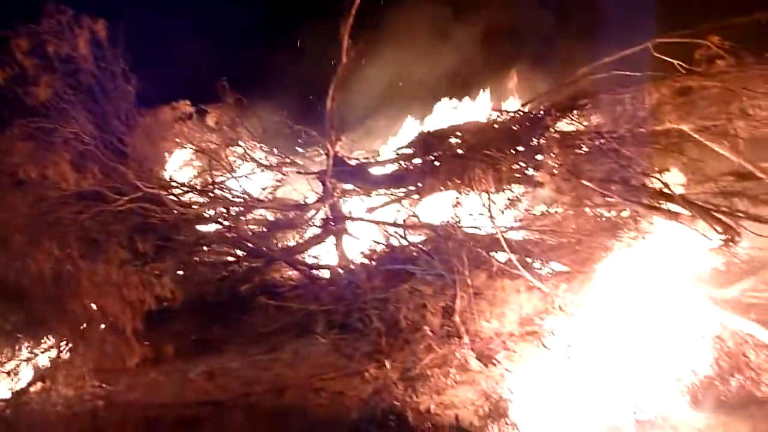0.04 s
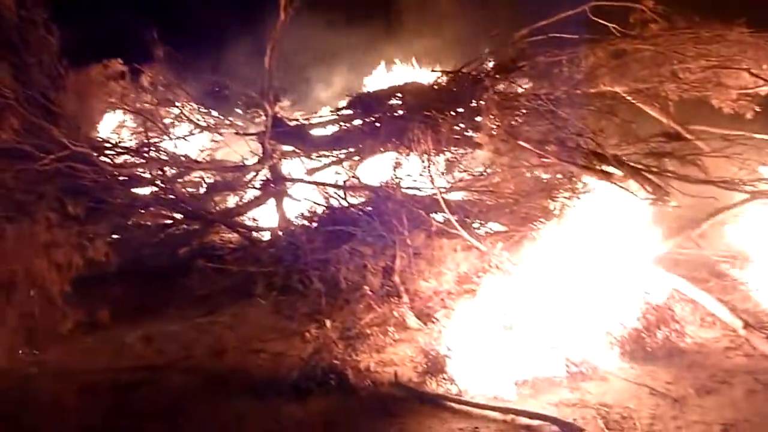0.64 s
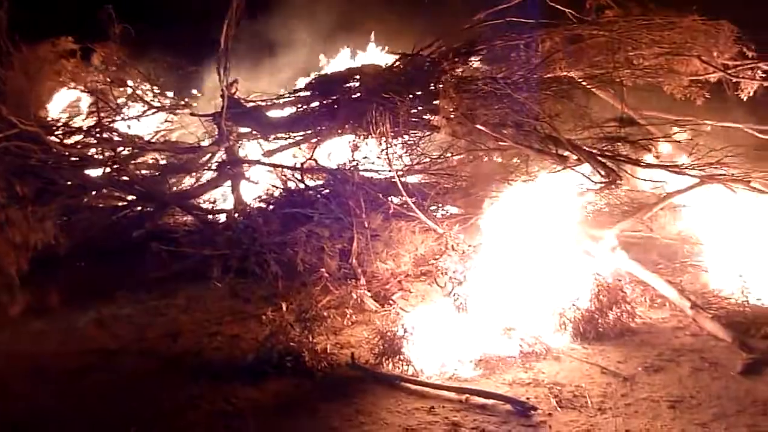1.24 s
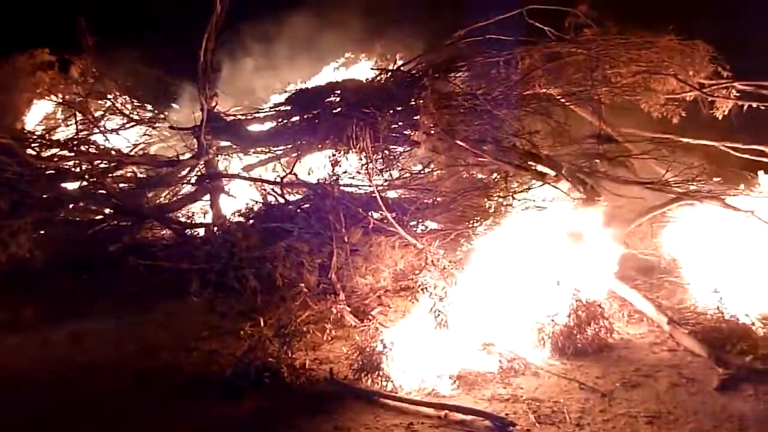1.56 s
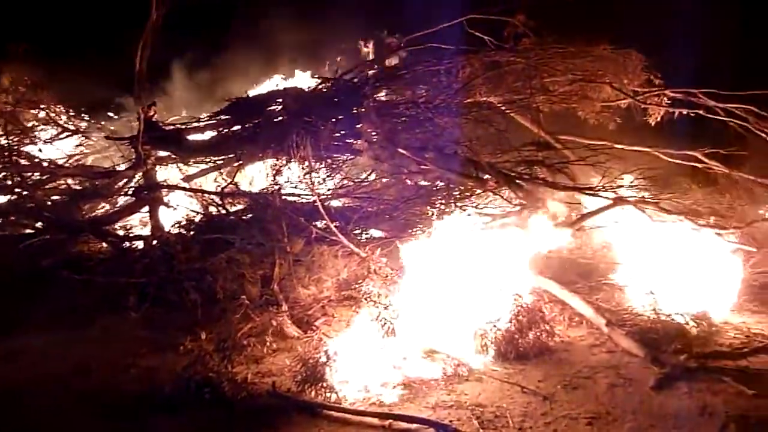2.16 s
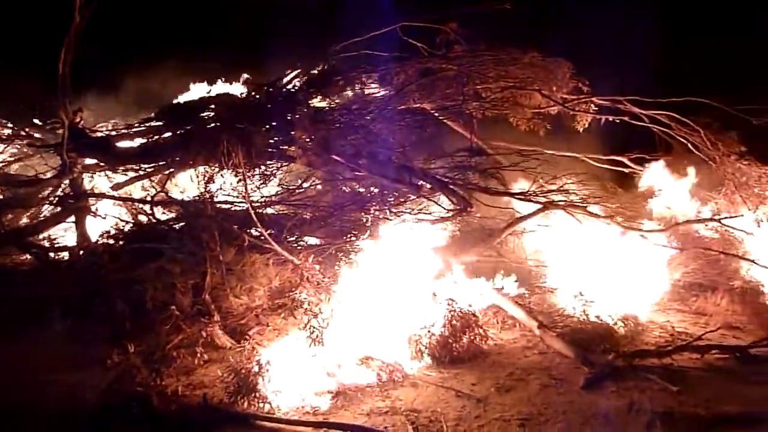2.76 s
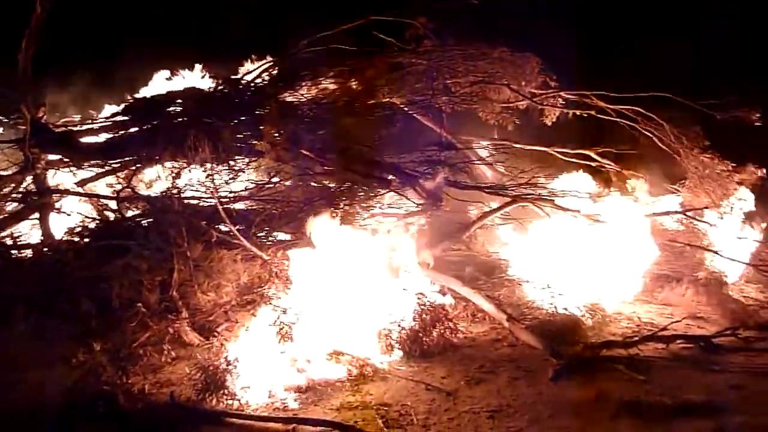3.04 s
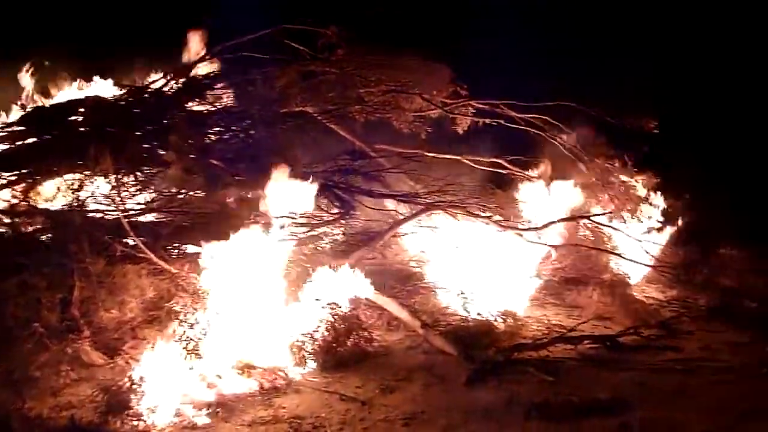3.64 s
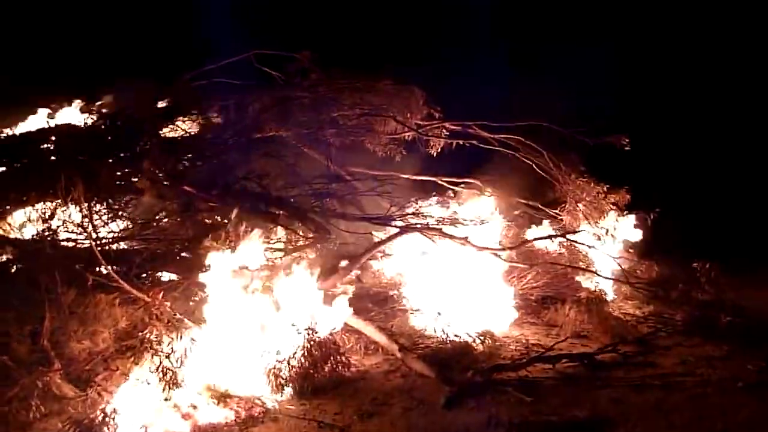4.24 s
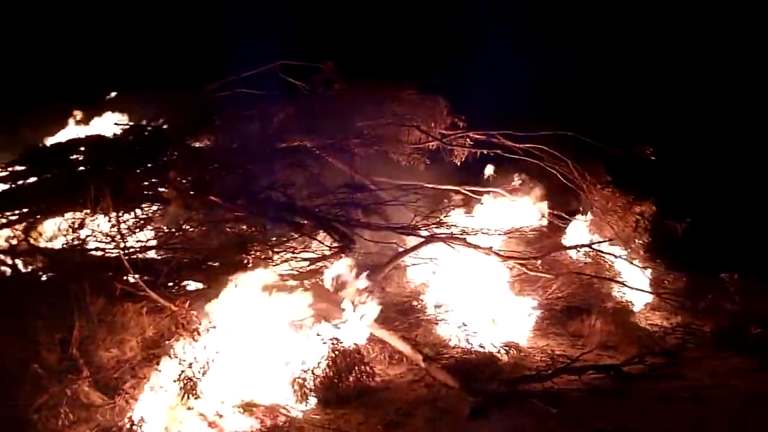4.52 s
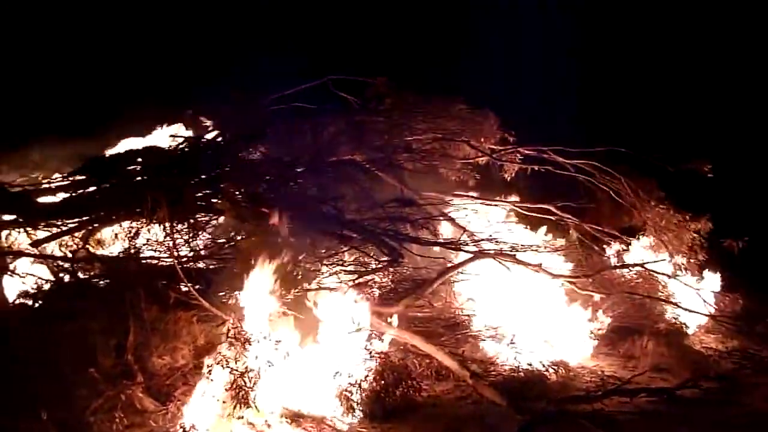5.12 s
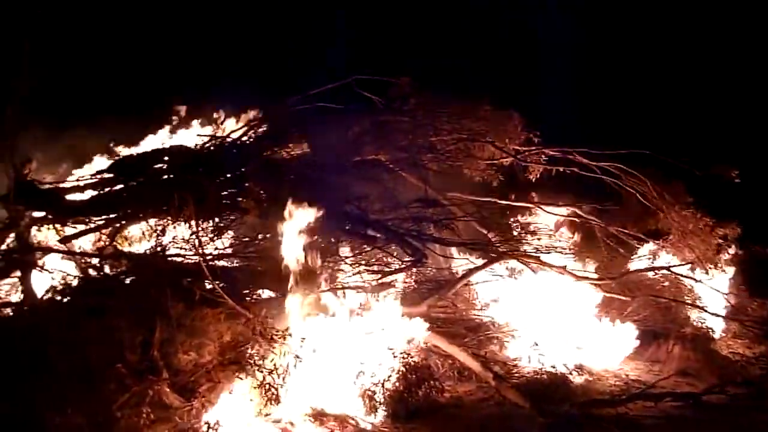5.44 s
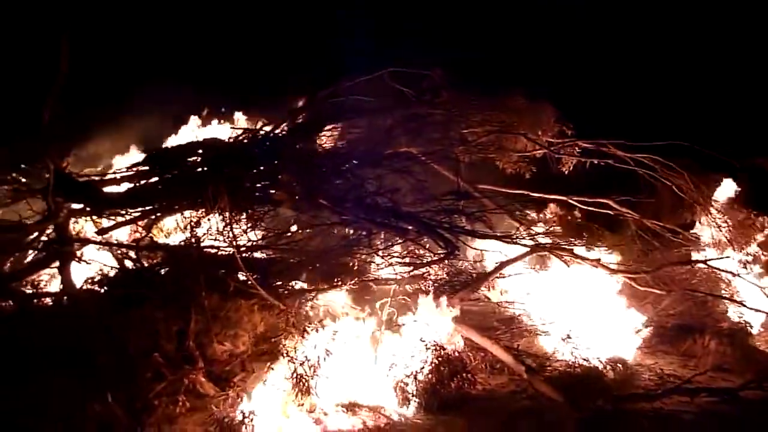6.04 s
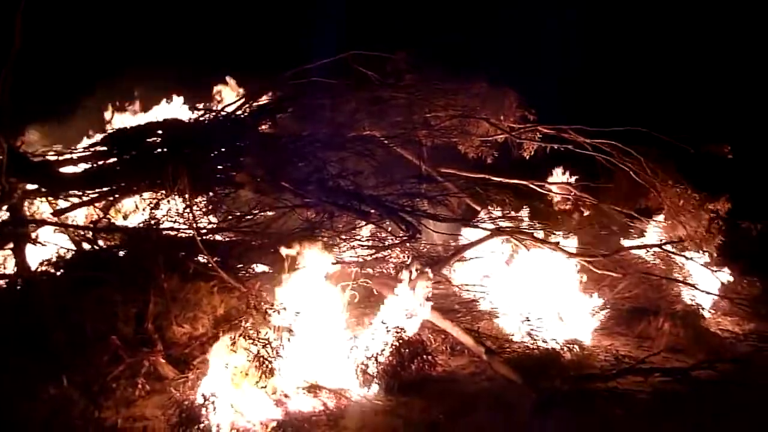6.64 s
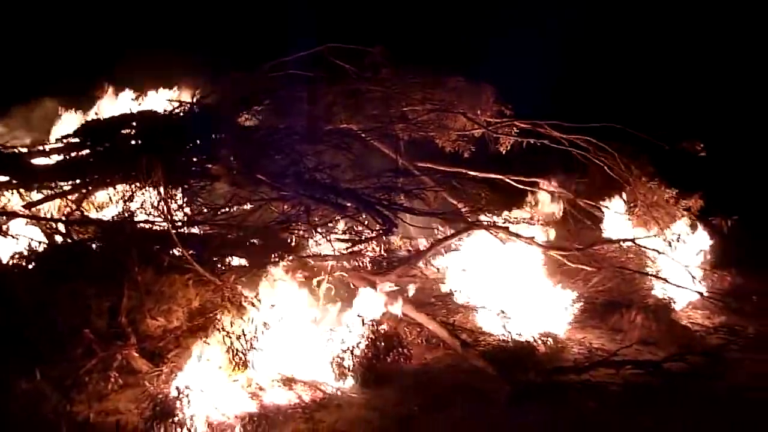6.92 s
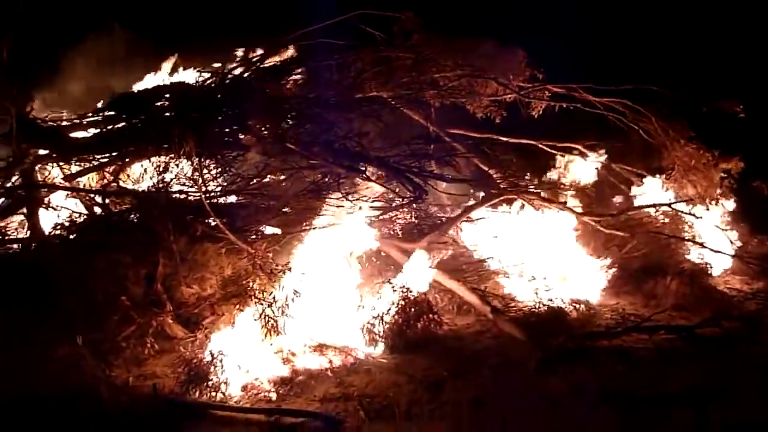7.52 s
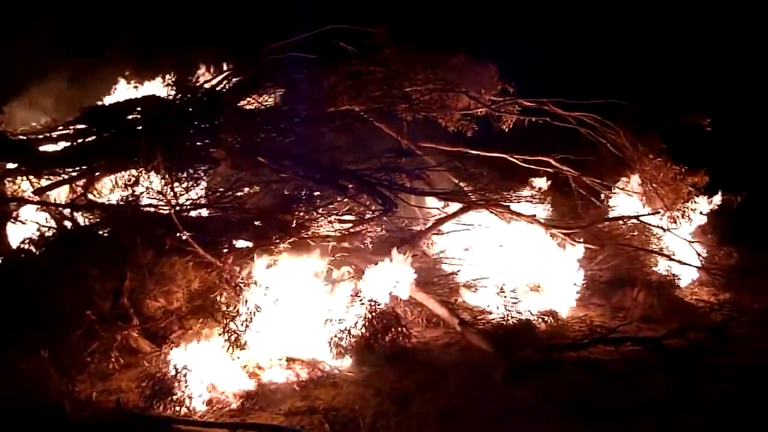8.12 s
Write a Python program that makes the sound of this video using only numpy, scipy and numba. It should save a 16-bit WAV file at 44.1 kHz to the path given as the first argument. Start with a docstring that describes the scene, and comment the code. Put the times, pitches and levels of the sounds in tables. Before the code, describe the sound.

Uneven wind thumps and rumbles on a microphone near an outdoor brush fire. The flames roar softly beneath sizzling sap, constant small crackles and scattered sharp snaps of wood. The strongest gusts come early and make the fire dip for a moment. The wind then eases, letting the pops stand out, before lighter gusts return and the crackling grows a little quieter.

```python
"""A large brush pile burns outdoors at night, in a gusty wind.
The flames roar softly, sap sizzles out in tiny jets and twigs crackle; now and then one bursts with
a sharp pop that scatters through the branches. Air drawn into the pile adds a deep, even rumble.
The wind buffets the microphone with a lumpy rumble that grows brighter as it blows harder;
each strong blow makes the recorder's gain control turn the fire down for a moment."""
import sys
import numpy as np
from scipy import signal
from scipy.io import wavfile
from scipy.ndimage import uniform_filter1d, minimum_filter1d
from numba import njit

SR = 44100
rng = np.random.default_rng(int(sys.argv[2]) if len(sys.argv) > 2 else 0)


def store_wav(level_fs):
    """Save 16-bit WAV to argv[1]."""
    pcm = np.round(np.clip(np.atleast_2d(level_fs), -1, 1) * 32767)
    wavfile.write(sys.argv[1], SR, pcm.T.astype(np.int16))


N = 365148
TIME = np.arange(N) / SR
USUAL_CORNER_HZ = 280  # in a middling wind, the rumble falls away above this "corner"

# strong eddies (swirls of air) that hit the microphone: peak_s, level_db, corner_hz, length_ms
STRONG_EDDIES = [(.123, -20, 206, 11), (.275, -16, 504, 32), (.315, -22, 500, 26), (.618, -22, 206, 19),
                 (0.72, -12.5, 584, 7.2), (.829, -12.5, 480, 11.3), (0.856, -9, 438, 19),
                 (0.91, -11, 290, 19), (0.924, -14, 395, 7), (1.055, -26, 120, 24), (1.709, -15, 260, 27),
                 (1.723, -9.5, 440, 8.1), (1.758, -3, 325, 6.6), (1.771, -1, 370, 11.6),
                 (1.797, -4.5, 636, 7.1), (1.857, 2.5, 260, 8.2), (1.913, 2.5, 330, 8.7),
                 (1.928, -6, 490, 23), (2.498, -10.5, 564, 9.6), (2.519, -2, 260, 8.5),
                 (2.542, -6, 516, 6.3), (2.55, -12, 437, 11), (2.578, -12, 350, 5.5),
                 (2.594, -15.5, 380, 7.5), (2.649, -16.5, 169, 16), (2.693, -9.5, 347, 10),
                 (2.801, -17.5, 189.8, 9.7), (2.886, -14, 232, 22.3), (2.929, -16, 301.5, 10),
                 (3.193, -23.5, 177, 13), (3.451, -9.5, 166, 11.3), (3.498, -19, 198, 10),
                 (3.555, -24, 137, 14.4), (3.667, -21.5, 260, 11), (3.703, -13.5, 228, 13.7),
                 (3.762, -24, 238, 23), (3.861, -24.5, 186.5, 13), (4.013, -21, 162, 13),
                 (4.039, -19, 148.6, 13), (4.172, -23, 209, 16), (4.211, -16.5, 131, 21),
                 (4.3, -21, 120.3, 26), (4.468, -20, 179.4, 24), (4.516, -24, 140, 19),
                 (4.683, -22, 137.2, 21), (4.746, -30, 320, 4.4), (4.846, -20, 237, 14),
                 (4.99, -21, 220, 12), (5.479, -13, 151, 18), (5.585, -27, 149, 11), (5.78, -20.5, 166, 23),
                 (5.859, -12.5, 560, 6.9), (5.877, -7, 315, 8.7), (5.983, -11, 140, 18),
                 (6.001, -13, 522, 5), (6.012, -18, 501, 12), (6.252, -18, 260, 10), (6.264, -14, 426, 7.6),
                 (6.27, -12, 388, 5.4), (6.305, -16.5, 410, 13), (6.389, -9, 280, 7),
                 (6.402, -14, 521, 5.7), (6.41, -11.5, 700, 6.3), (6.431, -19.5, 400, 26),
                 (6.508, -18, 247, 17), (6.738, -15.5, 125, 20.5), (6.775, -19.5, 294, 13.7),
                 (6.844, -15.5, 209, 21), (6.933, -18, 107.8, 13), (7.14, -22, 220, 16),
                 (7.198, -14.5, 196, 22), (7.305, -13.5, 154, 19), (7.504, -16, 294.5, 18),
                 (7.576, -17.5, 148, 21), (7.628, -20.5, 320, 6.2), (7.71, -22, 360, 19),
                 (7.755, -14.5, 393, 7.8), (7.769, -18, 394, 9.4), (7.831, -22, 380, 6.6),
                 (7.85, -13, 270, 11), (7.89, -15, 304, 10.5), (7.956, -15.5, 480, 3.8),
                 (7.994, -21.5, 457, 9.2), (8.013, -18.5, 456, 4.7), (8.061, -20, 204, 9.2),
                 (8.126, -17, 138, 14), (8.159, -19.5, 400, 5.1), (8.198, -20, 460, 15)]


def from_db(db):
    """Turn decibels into a number to multiply by."""
    return 10 ** (np.asarray(db) / 20)


def rms_one(x):
    """Scale a signal so that its average strength (rms) is 1."""
    return x / np.sqrt(np.mean(x ** 2) + 1e-20)


def in_time(rows):
    """Join a table's timed points with straight lines: one curve for each column after the time."""
    times_s, *columns = np.transpose(rows)
    return [np.interp(TIME, times_s, column) for column in columns]


def butter(x, hz, kind, order=2):
    """Keep the "low" part, the "high" part or one "band" of a sound."""
    return signal.sosfilt(signal.butter(order, np.clip(hz, 10, .45 * SR), kind, fs=SR, output="sos"), x)


def drift(rate):
    """A smooth random wobble with a spread of 1, changing about rate times a second."""
    keep = np.exp(-80 * np.pi * rate / SR)
    noise = rng.standard_normal(N // 40 + 2002)  # one value per 40 samples, plus a run-up
    slow = signal.lfilter([1], [1, -2 * keep, keep * keep], noise)[2000:]
    return np.interp(np.arange(N) / 40, np.arange(len(slow)), rms_one(slow))


def banded_noise(spectrum, shared_db, patchy_db, flicker_rate):
    """Noise in bands about a third of an octave wide, which flicker together and each on its own."""
    hz, db = np.transpose(spectrum)
    edges = np.geomspace(hz[0], hz[-1], int(3 * np.log2(hz[-1] / hz[0])) + 2)
    white = rng.standard_normal((2, N))
    together, out = drift(flicker_rate), 0
    for k, (low, high) in enumerate(zip(edges, edges[1:])):
        level_db = np.interp(np.log(low * high) / 2, np.log(hz), db)
        gain = from_db(level_db + shared_db * together + patchy_db * drift(flicker_rate))
        out = out + gain * butter(white[k % 2], [low, high], "band")
    return rms_one(out)


def fire(waver_db=1.47, roar_db=-44, roar_follows=.65):
    """Flames roar, sap sizzles and twigs crackle, all swelling and sinking with the blaze."""
    # how strongly the pile burns: time_s, level_db
    blaze = [(0, -52.5), (.3, -46.5), (.95, -50), (1.55, -44.5), (1.9, -48), (2.05, -45.5), (2.4, -55.5),
             (2.85, -53.5), (3.35, -51.5), (3.9, -55), (4.4, -55.5), (5.2, -52), (5.75, -54.5),
             (6.03, -59.5), (6.6, -61), (7.1, -59), (8.28, -65.5)]
    # strength of the needles' fine fizz, relative to the blaze: time_s, level_db
    fizz_levels = [(0, -6), (1.2, -7.5), (2.4, -5.5), (3.3, -5), (4.25, -6.5), (4.7, -9), (5.7, -8.5),
                   (7.1, -6), (8.28, -7)]
    # tone of the roaring flames: pitch_hz, level_db
    roar_tone = [(90, 23.5), (180, 8), (350, 8), (700, 6), (1300, 6.5), (2100, 1), (3300, 0), (4500, -8),
                 (8000, -17.5)]
    # tone of the sizzling sap: pitch_hz, level_db
    sizzle_tone = [(1800, -10), (3000, 3.5), (4500, -8), (6900, 3.5), (8200, -22.5), (10000, -32)]
    # tone of the fizzing needles: pitch_hz, level_db
    fizz_tone = [(7500, -5), (8800, 3.5), (10200, -18), (12600, 7), (14300, -6), (16000, -23)]
    blaze_db = in_time(blaze)[0] + waver_db * drift(5)
    fizz_db = in_time(fizz_levels)[0]
    roar_gain = from_db(roar_db + roar_follows * (blaze_db - blaze_db.mean()))
    roar = roar_gain * banded_noise(roar_tone, shared_db=2, patchy_db=2.2, flicker_rate=156)
    sizzle = banded_noise(sizzle_tone, shared_db=2, patchy_db=1.3, flicker_rate=75)
    fizz = from_db(fizz_db) * banded_noise(fizz_tone, shared_db=1, patchy_db=0.9, flicker_rate=40)
    twigs = crackle(per_s=190, size_db=11, largest=2.23, echo_db=-22.5, span_hz=(2740, 7900), kinds=12)
    needles = crackle(per_s=120, size_db=5, largest=4, echo_db=-9.5, span_hz=(10400, 13500), kinds=5)
    crackling = from_db(-4) * twigs + from_db(fizz_db - 4.5) * needles
    hissing = sap_jets() * (sizzle + fizz)  # the same jets drive both
    return roar + from_db(blaze_db) * (hissing + crackling)


def sap_jets(per_s=260, size_db=9.5, fade_s=0.011, even_flow=0.47):
    """A loudness curve: sap escapes in tiny jets that start at once and fade, over an even flow."""
    sizes = from_db(size_db * np.minimum(rng.exponential(1, N), 3.5))
    jets = sizes * (rng.random(N) < per_s / SR)
    power = signal.lfilter([1], [1, -np.exp(-1 / (fade_s * SR))], jets ** 2 + 1e-18)
    return rms_one(np.sqrt(even_flow + power / power.mean()))


def crackle(per_s, size_db, largest, echo_db, span_hz, kinds):
    """Small twigs or needles snap at random, many faintly and a few strongly."""
    starts = np.flatnonzero(rng.random(N) < per_s * from_db(3 * drift(8)) / SR)
    sizes = from_db(size_db * np.minimum(rng.exponential(1, len(starts)), largest))
    sizes *= rng.choice([-1, 1], len(starts))
    kind, out = rng.integers(0, kinds, len(starts)), 0
    for k, hz in enumerate(np.geomspace(*span_hz, kinds)):
        clicks = np.zeros(N)
        clicks[starts] = sizes * (kind == k)
        sound = snap(hz / 2 ** (1 / 8), hz * 2 ** (1 / 8), echo_db, -14, -20, tear_s=0.0011)
        out = out + signal.oaconvolve(clicks, sound)[:N]
    return rms_one(out)


def snap(low_hz, high_hz, echo_db, ring_db, tick_db, thickness=1, tear_s=0.0095):
    """One twig bursts: a crack and tearing fibres set the wood ringing; branches and ground echo it."""
    t = np.arange(int(.1 * SR)) / SR
    ring_s, echo_s = 0.011, 0.067  # like tear_s, the time to fade by 60 dB
    first, later = t < .003, (t > .004) & (t < .018)
    band_hz = [low_hz / (1.1 * thickness), high_hz * 1.11]
    tearing = rng.standard_normal(len(t)) * from_db(-60 * t / tear_s)
    tearing[0] = from_db(11)  # the opening crack
    burst = butter(tearing, band_hz, "band", order=1)
    ring = (np.sin(2 * np.pi * low_hz * t) - np.sin(2 * np.pi * high_hz * t)) * from_db(-60 * t / ring_s)
    ring = from_db(ring_db) * ring / ring[first].std()
    # a thin, very high tick as each crack rings the microphone
    mic_ring_tick = butter(tearing, [11700, 13300], "band")
    # the echoes carry the pitches of the wood
    scatter = rng.standard_normal(len(t)) * from_db(-60 * t / echo_s) * (1 - np.exp(-t / 0.0005))
    echoes = butter(scatter, band_hz, "band", order=1)
    echoes += signal.fftconvolve(scatter, ring)[:len(t)] / first.sum()
    sound = burst / burst[first].std() + ring + from_db(echo_db) * echoes / echoes[later].std()
    # a twig deep in the pile is heard with more echo and less treble
    muffle_hz = max(1.06 * high_hz * 2 ** (-(echo_db + 8) / 9), 6000)
    sound = butter(butter(sound, muffle_hz, "low"), 1020, "high")
    return sound + from_db(tick_db) * mic_ring_tick / mic_ring_tick[first].std()


def draught(level_db=-43.5):
    """Air drawn into the pile keeps up a deep, even rumble."""
    return from_db(level_db) * rms_one(butter(rng.standard_normal(N), [50, 130], "band"))


def wind(level_db=-1.5, flap_db=1.5, flutter_db=2.5, hard_blow_db=-14, boom_db=-9, steady_s=0.017):
    """Air swirls at the microphone's opening: a harder blow is both louder and brighter."""
    power, corner_hz, steep_share = airflow()
    # the flow flaps, and the smallest eddies make level and brightness flutter together
    flap, flutter = drift(24), drift(70)
    wobbling_hz = np.clip(corner_hz * 2 ** (0.1 * flutter + 0.07 * flap), 40, 3000)
    # in fast air the corner sharpens into a throaty ring
    speed = corner_hz / USUAL_CORNER_HZ
    damping = np.clip(1.61 / speed ** 0.22, .7, 2)
    rumble = moving_lowpass(rng.standard_normal(N) / np.sqrt(wobbling_hz), wobbling_hz, damping)
    # fast air has few large eddies, so its bass thins out
    rumble -= moving_lowpass(rumble, 0.32 * speed ** 0.16 * wobbling_hz, np.full(N, 2.))
    # fast air, a hard blow and the steep front of an eddy all let more treble through
    force_octaves = (10 * np.log10(power) - hard_blow_db) / 40
    ragged_octaves = 0.31 * drift(130)  # the flow tears, so the treble comes in shreds
    treble_hz = 1350 * speed ** 0.88 * 2 ** (0.14 * steep_share + force_octaves + ragged_octaves)
    rumble = moving_lowpass(rumble, np.clip(treble_hz, 500, 4000), np.full(N, 1.33))
    rumble = butter(rumble, 3960, "low", order=6)
    # the opening booms a little in the upper bass
    rumble += from_db(boom_db) * butter(rumble, [145, 215], "band", order=1)
    rumble = butter(rumble, 9, "high", order=1) * from_db(flutter_db * flutter)
    # even out all but the quickest swings, so that the flow sets the loudness
    window = int(steady_s * SR)
    rumble /= np.sqrt(uniform_filter1d(uniform_filter1d(rumble ** 2, window), window) + 1e-20)
    return from_db(level_db + flap_db * flap) * np.sqrt(power) * rumble + thumps(power, corner_hz)


def airflow(eddies_per_s=3, eddy_db=6.5, eddy_ms=13.4, gust_steepness=0.34, lull_s=0.03):
    """Breeze, gusts, eddies and lulls set the wind's power, its corner and how steeply it arrives."""
    # the breeze between gusts: time_s, level_db, corner_hz
    breeze = [(0, -25.5, 351), (.55, -29, 280), (1.08, -25, 218), (1.25, -40, 317), (1.5, -36, 334),
              (1.9, -26.5, 255.6), (2.8, -26, 190), (2.98, -27.5, 138.5), (3.09, -39.5, 184),
              (3.3, -30.5, 205.6), (3.5, -26.5, 162), (3.95, -35.5, 187), (4.7, -33, 162.3),
              (5.1, -26.5, 166.5), (5.22, -40, 317), (5.42, -36, 322), (5.52, -29.5, 178.5),
              (6.2, -25, 200), (6.62, -31, 151), (7.42, -27.5, 180.1), (8.28, -26.5, 218.7)]
    # gusts that swell and sink: peak_s, level_db, length_s, corner_hz
    gusts = [(0.299, -23, 0.17, 650), (0.72, -21.5, 0.1, 530), (0.873, -19, 0.081, 496),
             (1.085, -20, 0.037, 274), (1.619, -22, 0.07, 228), (1.777, -13, 0.11, 420),
             (1.887, -6.5, 0.11, 335), (2.083, -16, 0.095, 460), (2.316, -18.5, 0.036, 345),
             (2.574, -16.5, 0.088, 297), (2.724, -20.5, 0.078, 320), (3.375, -26, 0.047, 198),
             (4.758, -20, .045, 180), (5.07, -24, 0.048, 150.3), (5.914, -16, 0.044, 484),
             (6.101, -17, 0.023, 376), (6.158, -24, 0.036, 380), (6.266, -20, 0.037, 381),
             (6.859, -22.5, 0.062, 398), (7.624, -20.5, 0.065, 207), (7.858, -26, 0.22, 304.4),
             (7.988, -26, 0.092, 452), (8.198, -28, 0.077, 486)]
    # moments when the air falls still: middle_s, drop_db
    lulls = [(2.465, 5), (.79, 3.5), (3.24, 6), (3.81, 4), (3.911, 17), (4.09, 9), (4.58, 2), (5.55, 13),
             (6.345, 0), (6.629, 8), (7.07, 4.5), (7.26, 1), (7.38, 20), (7.544, 5), (8.093, 17.5)]
    breeze_db, corner_hz = in_time(breeze)
    # weak eddies ride on the breeze at random, about eddy_db above it
    peaks = np.flatnonzero(rng.random(N) < eddies_per_s / SR)
    weak_eddies = [(i / SR, breeze_db[i] + eddy_db + 2 * rng.standard_normal(), corner_hz[i], eddy_ms)
                   for i in peaks]
    blows = [(s, db, length_s, hz, gust_steepness) for s, db, length_s, hz in gusts]
    blows += [(s, db, ms / 1000, hz, 1) for s, db, hz, ms in STRONG_EDDIES + weak_eddies]
    power = from_db(breeze_db) ** 2
    weighted_hz = power * corner_hz  # the strongest blow has the most say in the corner
    steep_power, lull_db = np.zeros(N), np.zeros(N)
    for peak_s, db, length_s, hz, steepness in blows:
        near, bell = swell(peak_s, length_s, hz)
        blow = from_db(db) ** 2 * bell
        power[near] += blow
        weighted_hz[near] += blow * hz
        steep_power[near] += blow * steepness
    for middle_s, drop_db in lulls:
        near, bell = swell(middle_s, lull_s, 0)
        lull_db[near] -= drop_db * bell
    return power * from_db(lull_db) ** 2, weighted_hz / power, steep_power / power


def swell(peak_s, length_s, corner_hz):
    """The samples a blow or lull covers, and its bell shape; bright blows have a steeper front."""
    near = slice(max(int((peak_s - 2 * length_s) * SR), 0), int((peak_s + 2 * length_s) * SR))
    passing = 2 * (TIME[near] - peak_s) / length_s
    steepness = np.where(passing < 0, 2 + corner_hz / 300, 2)
    return near, .5 ** (np.abs(passing) ** steepness)


@njit
def moving_lowpass(x, corner_hz, damping):
    """Soften everything above a moving corner; less damping makes the corner ring more."""
    step = 2 * np.pi * corner_hz / SR
    out, low, band = np.empty_like(x), 0.0, 0.0
    for i in range(len(x)):
        band += step[i] * (x[i] - low - damping[i] * band)
        low += step[i] * band
        out[i] = low
    return out


def thumps(power, corner_hz, usual_per_s=22, boost_db=1.5):
    """An eddy's core passes as one dip of pressure: one per strong eddy, small ones all through."""
    peaks = np.flatnonzero(rng.random(N) < usual_per_s * corner_hz / USUAL_CORNER_HZ / SR)
    size, pitch = np.clip(rng.standard_normal((len(peaks), 2)), -2, 2).T
    small_db = 10 * np.log10(power[peaks]) + size
    small_hz = 0.93 * corner_hz[peaks] * 2 ** (0.47 * pitch)
    cores = [(s, db, 0.74 * hz) for s, db, hz, _ in STRONG_EDDIES]
    cores += zip(peaks / SR, small_db, small_hz)
    out = np.zeros(N)
    for peak_s, db, hz in cores:
        near = slice(max(int((peak_s - 2 / hz) * SR), 0), int((peak_s + 2 / hz) * SR))
        passing = np.pi * hz * (TIME[near] - peak_s)
        out[near] -= from_db(db + boost_db) * (1 - 3 * passing ** 2) / (1 + passing ** 2) ** 3
    return butter(out, 1300, "low")


def pops(thin_twig_db=-35, db_per_octave=20):
    """Single twigs burst with a sharp pop; thicker wood is louder and reaches lower."""
    # the loudest bursting twigs: start_s, level_db, low_hz, high_hz, echo_db, ring_db, tick_db
    # (the last three are relative to the burst itself)
    bursts = [(.035, -35.5, 5000, 7100, -20, -14, -19), (.237, -29.5, 5100, 7100, -12, -10, -12),
              (.533, -20, 3720, 6600, -9, -4, -32), (.685, -35, 5500, 7200, -15, -8, -16),
              (.759, -34.5, 4860, 6460, -16, -5, -16), (0.9641, -28.5, 3740, 4340, -14, -9, -24),
              (1.091, -39, 4000, 6000, -11, -11, -24), (1.11, -19.5, 2530, 6070, -17, -7, -14),
              (1.139, -28.5, 3600, 6170, -14, -6, -13), (1.2244, -23.5, 5400, 7260, -24, 1, -20),
              (1.2922, -31.5, 4200, 6250, -4.5, -2, -26), (1.4152, -35.5, 3200, 4440, 0, -12, -20),
              (2.0944, -24, 5000, 6750, -17, -10, -23.5), (2.3942, -37.5, 4230, 6040, -19, -8, -17.5),
              (2.491, -39.5, 5800, 7350, -14, -19, -8), (2.859, -39.5, 3900, 5280, -25, -8, -18),
              (2.8759, -37.5, 4000, 4620, -14, 5, -21), (2.923, -35, 4400, 6110, -16, -11, -16),
              (3.0384, -35.5, 3750, 5340, -19, 0, -25), (3.286, -38, 4150, 5600, -12, -8, -13.5),
              (3.45, -38, 5460, 8500, -22, -11, -12), (3.508, -25.5, 3130, 4220, -15, -3, -29),
              (3.547, -51, 5670, 7400, -25, -13, -9.5), (3.58, -41, 3800, 5600, -11, -8, -14),
              (3.621, -29, 3350, 5750, -23, -7, -3), (3.6345, -25, 3520, 5670, -20.5, 1.5, -9),
              (3.6823, -27.5, 4300, 5060, -6, 1.5, -17), (3.984, -40, 5770, 7400, -16, -12, -8),
              (4.175, -41, 3100, 4300, -3, -20, -22), (4.2701, -28.5, 4140, 6500, -10, -5, -11),
              (4.306, -31.5, 3200, 4250, -20, -8, -18), (4.54, -38.5, 2600, 3600, -16, -6, -24),
              (4.577, -29, 3940, 5750, -14, -7, -17), (4.672, -42.5, 3800, 5500, -12, -8, -16),
              (4.951, -35, 1400, 1900, -22, -4, -30), (4.9682, -34.5, 3460, 4600, -31, -14, -23),
              (5.338, -38, 6170, 7900, -25, -11, -13), (5.3589, -17, 2400, 3760, -13, -10, -34),
              (5.457, -33.5, 5400, 7600, -28, -8, -13), (5.893, -37, 5000, 6750, -18, -10, -17.5),
              (5.978, -38, 5790, 7390, -17, -15, -12), (6.0895, -37.5, 5690, 7300, -14, -18, -9),
              (6.643, -40, 2976, 4130, -4, -8, -24), (6.6847, -40, 3800, 5400, -13, -2, -20),
              (6.736, -39.5, 3340, 4830, -14, -12, -26), (6.793, -42, 4870, 6560, -21, -5, -14),
              (7.0786, -32.5, 5175, 6860, -18, -15, -12), (7.49, -42.5, 5060, 6900, -18, -10, -13.5)]
    out = np.zeros(N + SR)
    for start_s, level_db, *twig in bursts:
        thickness = 2 ** (max(level_db - thin_twig_db, 0) / db_per_octave)
        sound = from_db(level_db) * snap(*twig, thickness)
        start = int(start_s * SR)
        out[start:start + len(sound)] += sound
    return out[:N]


def gain_control(x, limit_db=-19, cut_share=0.83, attack_s=0.00093, hold_s=0.057, climb_db_per_s=45.5):
    """A loud, bright blow turns the volume down at once; it stays down briefly, then climbs back."""
    sensed = butter(x, 260, "high", order=1)  # deep bass counts for less
    power = uniform_filter1d(sensed ** 2, int(0.0063 * SR))
    level_db = 10 * np.log10(np.abs(power) + 1e-12)
    cut_db = cut_share * np.maximum(level_db - limit_db, 0)
    half_hold = int(hold_s * SR / 2)
    held_db = -minimum_filter1d(-cut_db, 2 * half_hold + 1, origin=half_hold)
    climb_db = climb_db_per_s * TIME
    easing_db = np.maximum.accumulate(held_db + climb_db, axis=-1) - climb_db
    keep = np.exp(-1 / (attack_s * SR))
    return x * from_db(-signal.lfilter([1 - keep], [1, -keep], easing_db))


def scene():
    """The fire ahead and the wind on the microphone, in one channel."""
    return (fire() + from_db(-0.5) * pops() + draught() + wind())[None, :]


def record(dry, top_hz=15900):
    """The recorder thins the deepest bass, turns down loud blows, and cuts two notches and the top."""
    # narrow gaps in what the recorder picks up: pitch_hz, sharpness (pitch divided by width)
    notches = [(2890, 14), (7850, 21)]
    out = gain_control(butter(dry, 33, "high"))
    for pitch_hz, sharpness in notches:
        out = signal.lfilter(*signal.iirnotch(pitch_hz, sharpness, fs=SR), out)
    return signal.sosfilt(signal.ellip(10, .2, 80, top_hz, fs=SR, output="sos"), out)


dry = scene()
out = record(dry)
store_wav(out)
```